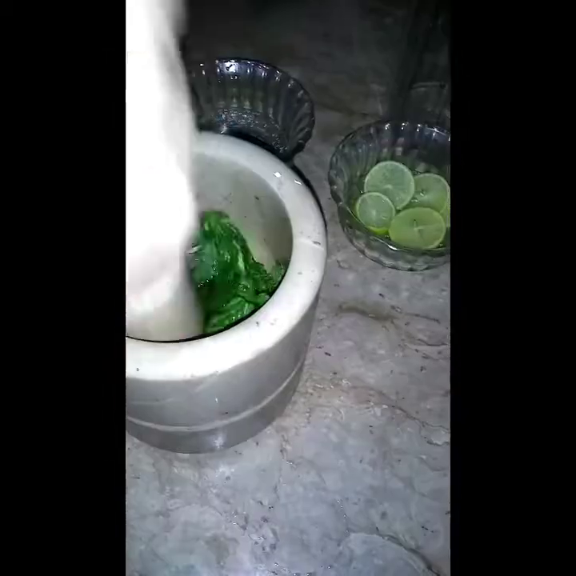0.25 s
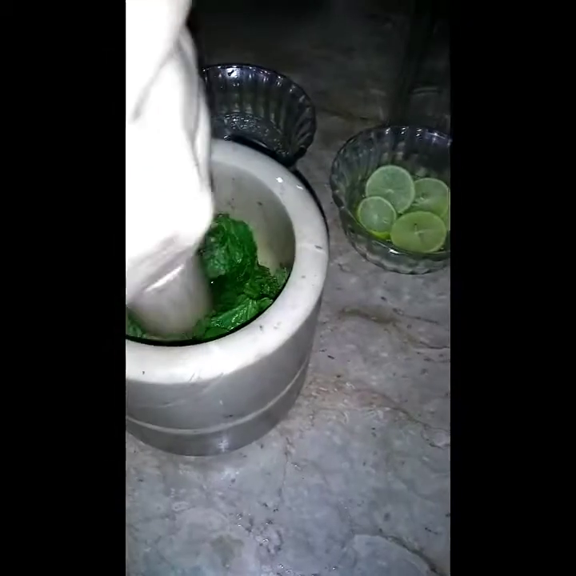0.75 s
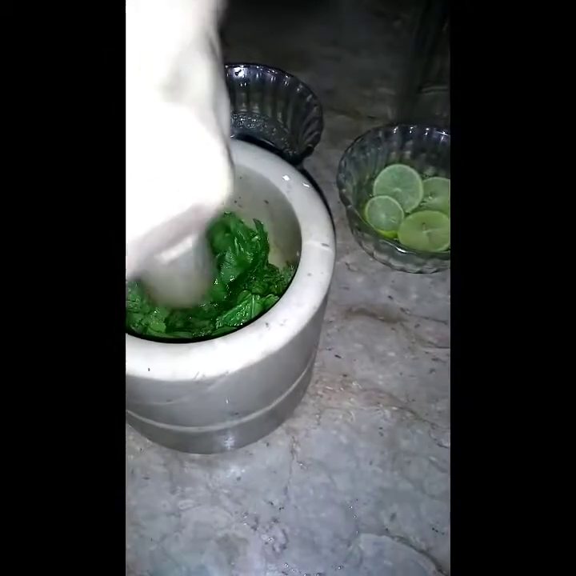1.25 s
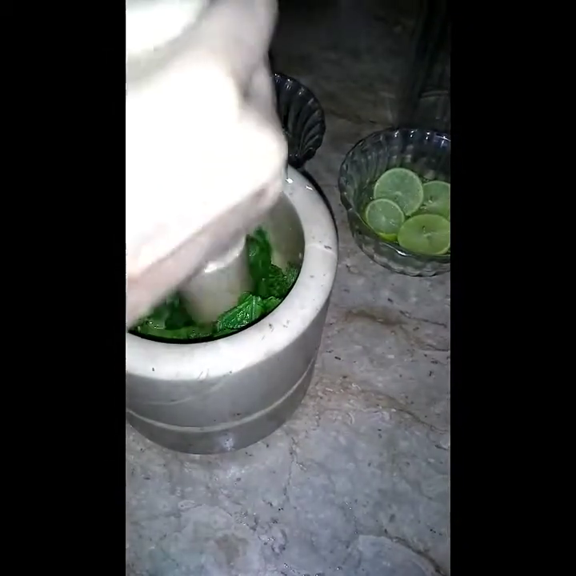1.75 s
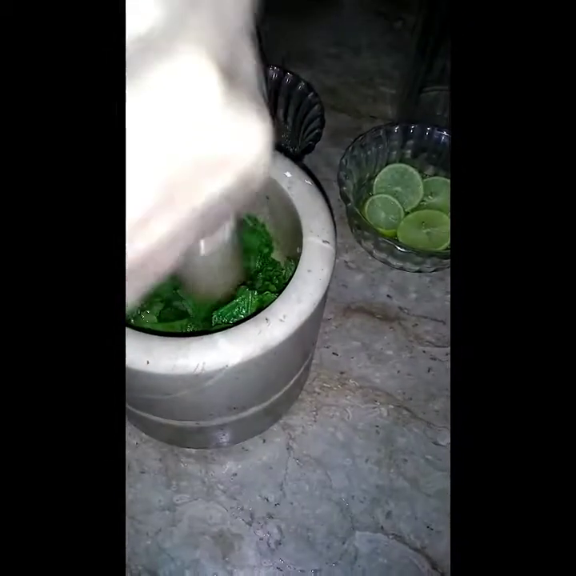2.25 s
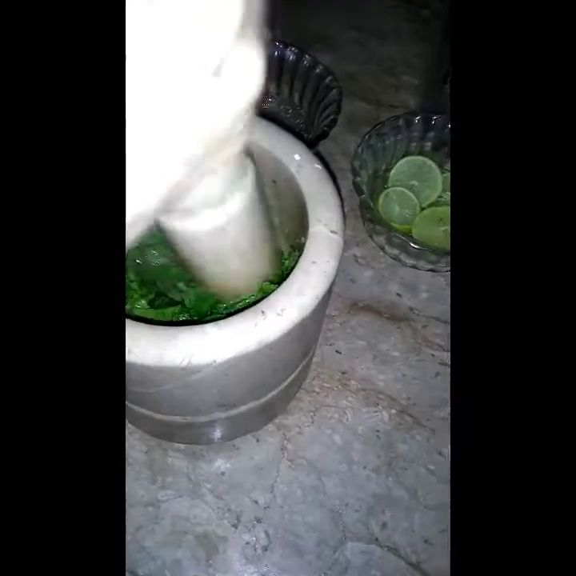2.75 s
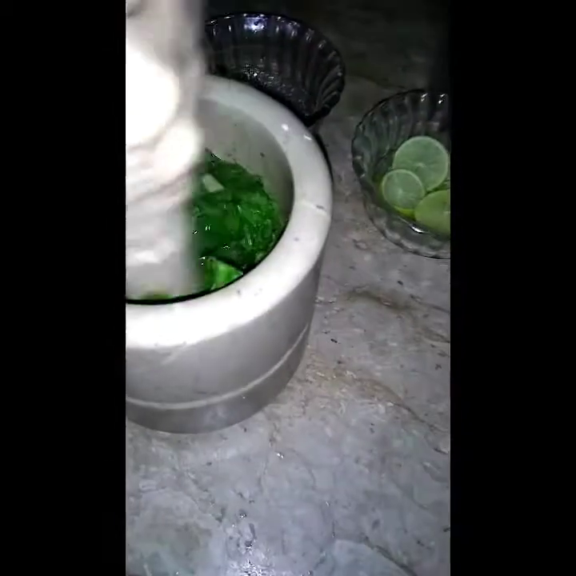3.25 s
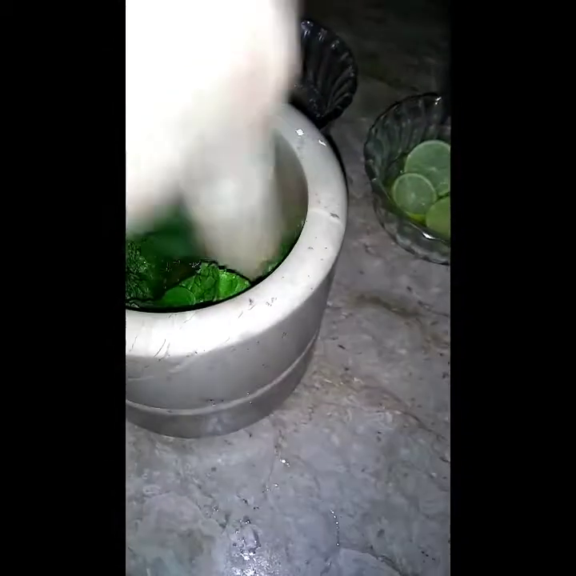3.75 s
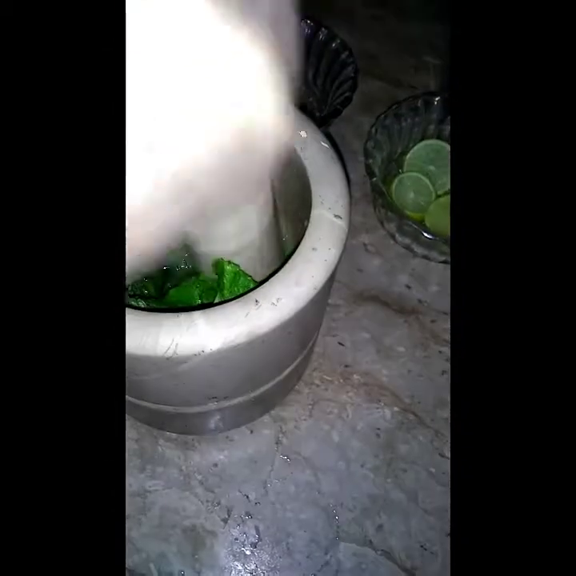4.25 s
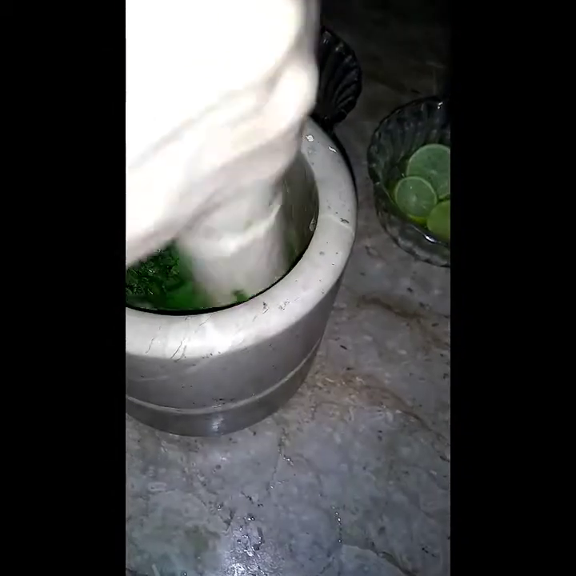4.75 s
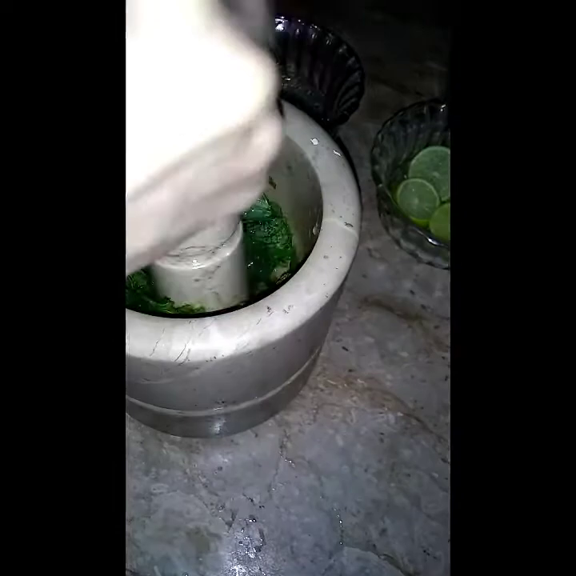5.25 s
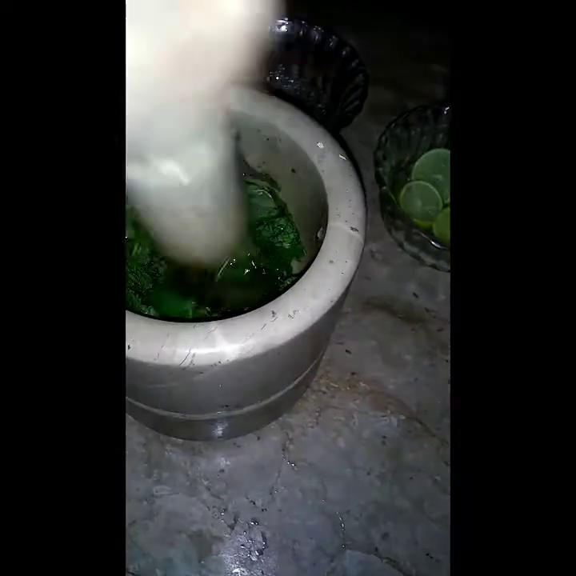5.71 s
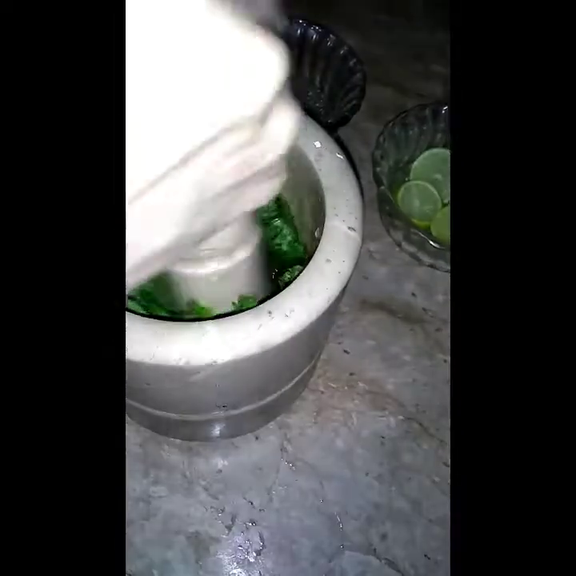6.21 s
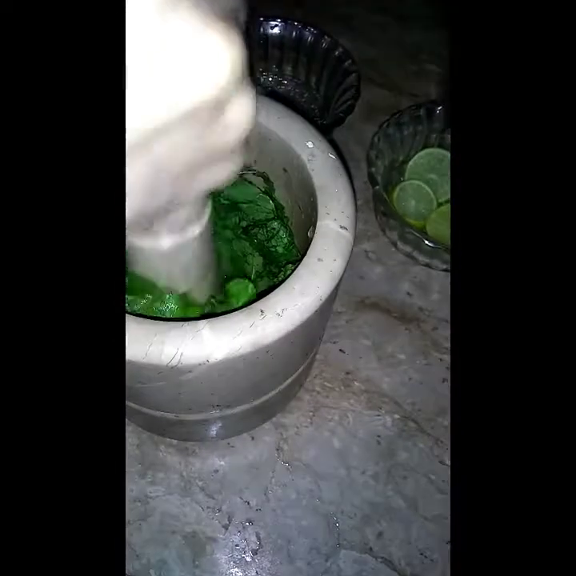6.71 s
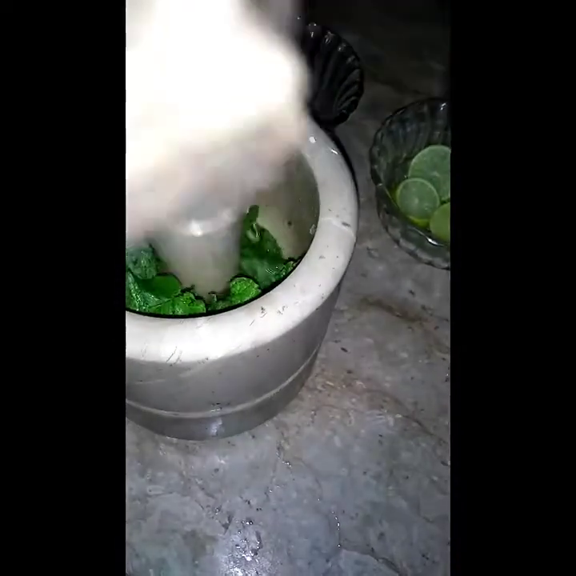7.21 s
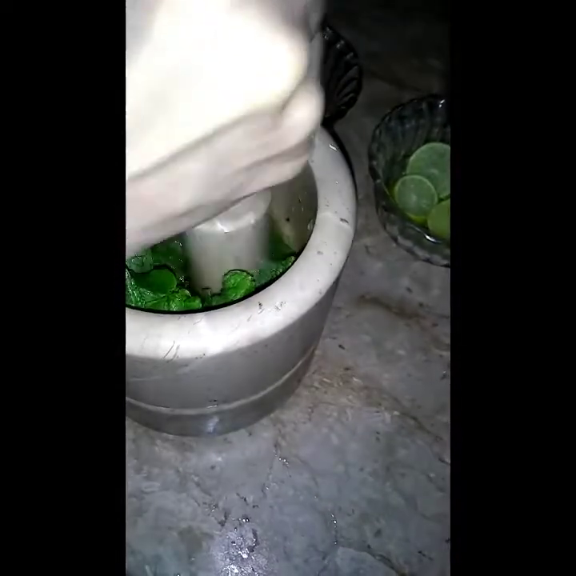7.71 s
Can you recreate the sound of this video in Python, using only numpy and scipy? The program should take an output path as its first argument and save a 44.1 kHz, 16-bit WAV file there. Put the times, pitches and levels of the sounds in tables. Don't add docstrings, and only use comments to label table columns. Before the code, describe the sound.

A stone pestle crunches and grinds leaves in a stone mortar, with irregular knocks and clacks, over a steady low fan hum.

```python
import sys
import numpy as np
from scipy import signal
from scipy.fft import rfft, irfft, next_fast_len
from scipy.io import wavfile
from scipy.ndimage import uniform_filter1d, minimum_filter1d, map_coordinates

SR = 44100
rng = np.random.default_rng(int(sys.argv[2]) if len(sys.argv) > 2 else 0)


def gain_from_db(level_db):
    decades = np.asarray(level_db, float) / 20
    return 10 ** decades


def waveform_to_disk(signal):
    frames = np.transpose(np.atleast_2d(signal))
    scaled = np.clip(frames, -1, 1) * 32767
    samples = np.round(scaled).astype(np.int16)
    wavfile.write(sys.argv[1], SR, samples)


N = 351477

# f/Hz, likeness [0..1]
PORT_LIKENESS = [(50, 0.71), (100, 0.85), (210, 0.98), (400, 0.6), (800, 0.38), (1500, 0.007),
                 (5000, 0.017)]


def unit(x):
    return x / np.sqrt(np.mean(x ** 2) + 1e-20)


def along(points, hz):
    f, v = np.transpose(points)
    return np.interp(np.log(hz + 1), np.log(f + 1), v)


def curve(rows):
    return np.interp(np.arange(N) / SR, *np.transpose(rows))


def filtered(x, response):
    m = next_fast_len(N + SR // 2)
    return irfft(rfft(x, m) * response(np.fft.rfftfreq(m, 1 / SR)), m)[..., :N]


def coloured(x, tone):
    def response(hz):
        gain = gain_from_db(along(tone, hz))
        return gain / np.sqrt(np.mean(gain ** 2))
    return filtered(x, response)


def wobble(rate):
    knots = rng.standard_normal(int(N * rate / SR) + 4)
    return map_coordinates(knots, [np.arange(N) * rate / SR])


def gritty(spread_db, rate):
    return unit(rng.standard_normal((2, N)) * gain_from_db(spread_db * wobble(rate)))


def patchy(x, depth_db, size):
    z = signal.stft(x, nperseg=size)[2]
    field = uniform_filter1d(rng.standard_normal(z.shape[1:]), size=5, axis=0)
    field = uniform_filter1d(field, size=6, axis=1)
    return unit(signal.istft(z * gain_from_db(depth_db * unit(field)), nperseg=size)[1][:, :N])


def add(out, s, sound):
    part = out[:, round(s * SR):][:, :sound.shape[-1]]
    part += sound[..., :part.shape[-1]]


def ring(modes, scatter_db, attack, skew, rough_db=0, lag=0):
    block = 150
    t = np.arange(SR // 4 // block * block) / SR
    hz, db, t60 = np.transpose(modes)[:, :, None]
    flutter = np.repeat(rng.standard_normal((2, len(hz), len(t) // block)), block, axis=2)
    level_db = db + scatter_db * rng.standard_normal(hz.shape) - 60 * t / t60
    size = gain_from_db(level_db + rough_db * uniform_filter1d(flutter, size=block))
    phase = skew * np.minimum(hz / 600, 1) * rng.standard_normal((2,) + hz.shape)
    late = np.reshape([lag, 0], (2, 1, 1))
    partials = size * np.sin(2 * np.pi * hz * (t - late) + phase)
    return np.sum(partials, axis=1) * (1 - np.exp(-t / attack))


# f/Hz, level/dB
LEAF_COLOUR = [(600, -39), (1300, -14.5), (2000, -6), (3500, 1.5), (5000, -4), (8000, -8), (11000, -12.5),
               (14500, -21)]


def crushed_leaves():
    # t/s, peak level/dB, bowl level/dB, sheen level/dB, pace/s
    pounding = [(0.1205, -33.5, -18, -25, 0.0068), (0.285, -29.5, -12, -38, 0.0071),
                (0.5453, -22.5, -10.5, -23, 0.0086), (0.816, -20, -10, -25, 0.0076),
                (1.119, -27, -1.5, -9, 0.0082), (1.3847, -20, -10.5, -38, 0.0075),
                (1.702, -25, -5, -14, 0.0073), (1.7494, -45, -14, -21, 0.0062),
                (1.97, -25, -1.5, -9, 0.0067), (2.0158, -34.5, -26, -34, 0.015),
                (2.228, -20, -9, -15, 0.0063), (2.4854, -18.5, -11, -23, .0057),
                (2.83, -29, -4.5, -15, .009), (3.734, -21, -7.5, -16, 0.0056),
                (3.9994, -20.5, -12.5, -61, 0.0079), (4.037, -26.5, -68, -27, 0.00084),
                (4.229, -15.5, -25, -15.5, 0.005), (4.495, -22, -34, -12, 0.0026),
                (4.508, -24, -17, -15.5, .005), (4.792, -32.5, -6, -32, .009),
                (6.738, -36, -8, -12, 0.0049), (7.001, -20.5, -8.5, -24, 0.0062)]
    # f/Hz, level/dB
    sheen_colour = [(5000, -36), (8000, 9.5), (11000, 5), (14500, -0.5)]
    # f/Hz, width/Hz, level/dB
    bowl_air = [(945, 78, 8), (1950, 230, -2), (3460, 660, -4)]
    press_s, decay_paces = 0.0085, 8.1
    t = np.arange(N) / SR
    burst, boom, sheen = np.zeros((3, N))
    for s, db, bowl_db, sheen_db, pace in pounding:
        since = t - s - .0012
        fall = -np.log(1000) * (since - press_s).clip(0) / (decay_paces * pace)
        shape = np.exp(np.minimum(since / pace, fall))
        burst += gain_from_db(db - 7.5) * shape
        sheen += gain_from_db(db + sheen_db + 0.5) * shape
        boom += gain_from_db(db + bowl_db + 15) * shape ** 1.52

    def cavity(hz):
        total = 0
        for k, (centre, width, db) in enumerate(bowl_air):
            band = 1j * hz * width
            total = total + (-1) ** k * gain_from_db(db) * band / (centre ** 2 - hz ** 2 + band)
        return total

    grit = coloured(burst * patchy(gritty(3.3, rate=500), 4.54, size=128), LEAF_COLOUR)
    grit += coloured(sheen * gritty(2.6, rate=500), sheen_colour)
    return grit + filtered(boom * gritty(1.66, rate=300), cavity)


def dragged_leaves():
    # t/s, level/dB
    pressure = [(0.0, -53.5), (0.15, -61), (1.3, -56.5), (1.46, -93), (1.69, -47.5), (1.9, -62),
                (2.48, -70), (2.9, -50), (3.25, -53.5), (3.66, -65), (3.84, -53.5), (4.35, -62),
                (4.86, -55), (5.3, -61), (6.2, -59), (7.1, -59.5), (7.66, -56.5), (7.97, -66)]
    # t/s of the height, level/dB, width/s
    scrapes = [(.1, -55, 0.011), (1.089, -45.5, 0.022), (1.43, -57, 0.078), (2.79, -53, 0.035),
               (2.928, -60, 0.023), (3.085, -51.5, 0.012), (3.22, -62, 0.016), (3.72, -44, 0.032),
               (3.98, -60, .015), (4.3, -70, 0.038), (4.748, -49, 0.042), (4.93, -57.5, 0.027),
               (5.9, -46, 0.024), (6.07, -49.5, 0.028), (6.108, -49, 0.009), (6.35, -60, .02),
               (6.76, -57, 0.0091), (6.95, -52.5, 0.04), (7.86, -60.5, 0.036)]
    t = np.arange(N) / SR
    scrape = sum(gain_from_db(db) * np.exp(-((t - s) / width) ** 2) for s, db, width in scrapes)
    drag = gain_from_db(curve(pressure) + 3.0) + gain_from_db(6.5) * scrape
    drag = drag * gain_from_db(1.8 * wobble(25))
    return coloured(drag * gritty(1.8, rate=570), LEAF_COLOUR)


def snapped_stems():
    # t/s, peak level/dB, f/Hz
    snaps = [(3.1404, -36, 3170), (3.192, -47, 3400), (3.765, -42, 3400), (5.6106, -61, 2900),
             (6.1679, -41, 3370), (6.313, -49, 3360), (6.4862, -42.5, 3300), (7.2744, -57, 3470),
             (7.397, -51, 3430), (7.6854, -48, 3500)]
    out = np.zeros((2, N))
    for s, db, hz in snaps:
        modes = [(hz, db + 14.0, .012), (1.1 * hz, db + 16, .008)]
        add(out, s, ring(modes, 0.5, .0003, 0.99))
    return out


def counter_blows():
    # t/s, peak level/dB, deep modes/dB, upper modes/dB, decay factor
    thuds = [(2.24, -32, -5, 6, 0.54), (2.505, -19.5, -5, -14, 0.6), (4.237, -10, -24.5, -17, 1.2),
             (4.513, -16.5, -7, -20, 1.2), (6.113, -9, -28, -20, 0.62), (6.481, -23.5, -18, -22, 1.7)]
    # t/s, peak level/dB, middle modes/dB, upper modes/dB, decay factor
    knocks = [(3.085, -14.5, -0.5, -20, 0.72), (3.144, -14, -1.5, 3, 0.91), (3.313, -18.5, 0.5, -16, 1.06),
              (3.329, -13, 2.5, 10, 1.1), (3.684, -21.5, 5.5, 16, 1.01), (5.322, -14.5, -9.5, -22, 0.63),
              (5.4, -26, -13, -7, .91), (5.832, -26.5, 5, 4, 3.5), (5.866, -30.5, 9.5, 13, 2.1),
              (5.885, -23.5, 0, 13, 2.2), (6.413, -30, -1, -16, 1.1), (6.42, -10.5, -15, -19, 0.72),
              (6.449, -23.5, -4.5, -12, 1.3), (6.57, -39, 8, -18, 2.2), (6.594, -33.5, 4.5, -19, 1.4),
              (6.61, -26, 1.5, -15, 0.91), (6.627, -23.5, 0, 7, 0.74), (7.909, -14.5, -2, 2.5, 0.94),
              (7.954, -18.5, -1.5, -14, 0.7), (7.962, -14.5, -3, -9, 1)]
    # f/Hz, level/dB, t60/s
    counter_modes = [(89, 11, 0.28), (123, 4, 0.3), (192, -18, 0.13), (263.4, 0.5, 0.12),
                     (347.4, -4.5, 0.18), (483, -21, 0.4), (561.4, 7, 0.056), (650, -13, 0.041),
                     (864, -6, 0.096), (1073, -8.5, 0.037), (1293, -13, 0.065), (1460, 0, 0.011),
                     (1597, -22.5, 0.21), (1820, -6.5, 0.011), (2100, -12.5, 0.059), (2500, -43, 0.19)]
    group_edges = [150, 450, 1000, 3000]
    thud_middle_db, knock_deep_db = -17.5, -27
    hits = [(s, db, deep_db, thud_middle_db, *rest) for s, db, deep_db, *rest in thuds]
    hits += [(s, db, knock_deep_db, *rest) for s, db, *rest in knocks]
    out, rattle = np.zeros((2, 2, N))
    hz, level_db, t60 = np.transpose(counter_modes)
    t = np.arange(SR // 4) / SR
    for s, db, deep_db, middle_db, upper_db, lasting in sorted(hits):
        contact_s = 0.00064 * gain_from_db(-.6 * upper_db)
        group_db = np.array([deep_db, 0, middle_db, upper_db, 0])[np.digitize(hz, group_edges)]
        modes = np.transpose([hz, db - 7.0 + level_db + group_db, t60 * lasting])
        add(out, s, ring(modes, 2.13, contact_s, 1.0, rough_db=7.0))
        rattle_size = gain_from_db(db + middle_db - 1.5 - 60 * t / (0.11 * lasting))
        add(rattle, s, rattle_size * rng.standard_normal((2, len(t))))
    out = filtered(out, lambda f: f ** 3 / (f ** 3 + 106.0 ** 3))
    dull = [(100, -32.5), (250, 4.5), (900, 6.5), (1800, -22), (3000, -26.5), (8000, -46)]
    return out + coloured(rattle, dull)


def stone_clacks():
    # t/s, crack level/dB, pestle level/dB, dishes level/dB
    clacks = [
        (1.971, -24.5, -60, -80),
        (3.329, -18, -49, -34.5),
        (3.685, -27, -37, -104),
        (5.832, -6.5, -14.5, -80),
        (5.869, -10.5, -80, -80),
    ]
    # f/Hz, level/dB, t60/s
    pestle_modes = [(3200, 10, 0.009), (4800, 9, 0.074), (4800, -13, 0.53), (5400, -15, 0.25),
                    (10000, -23.5, 0.45), (11600, -25, 0.086), (12510, -31, .1)]
    # f/Hz, level/dB, t60/s
    dish_modes = [(8200, -2, 0.15), (8350, -12, .08), (9300, -2.5, .13), (9700, -16, .06),
                  (10400, -16, .06), (11120, -16, 0.13), (11800, -14, .07), (12200, -5, 0.11),
                  (12600, -4, 0.13)]
    # f/Hz, level/dB
    crack_colour = [(300, -6), (1000, -3), (2500, 5), (4500, -11), (6000, -24.5), (14000, -40)]
    rim_lag = .00028
    out, crack = np.zeros((2, 2, N))
    t = np.arange(SR // 4) / SR
    for s, crack_db, pestle_db, dishes_db in clacks:
        shared, own = rng.standard_normal(len(t)), rng.standard_normal((2, len(t)))
        split = np.array([np.roll(shared, round(rim_lag * SR)), shared]) + 2.2 * own
        fade = gain_from_db(crack_db - 60 * t / 0.0076) + gain_from_db(crack_db - 20.5 - 60 * t / 0.22)
        add(crack, s, fade * split)
        add(out, s, gain_from_db(pestle_db) * ring(pestle_modes, 0.6, 0.0006, 0.18, rough_db=3.0, lag=rim_lag))
        add(out, s, gain_from_db(dishes_db) * ring(dish_modes, 1.5, 0.0051, 0.73, rough_db=7.5))
    return out + coloured(crack, crack_colour)


def glass_tinkles():
    # t/s, level/dB
    tinkles = [(3.085, -60), (3.19, -60), (5.33, -65)]
    # f/Hz, level/dB, t60/s
    glass_modes = [(5070, 0, 0.18)]
    out = np.zeros((2, N))
    for s, db in tinkles:
        add(out, s, gain_from_db(db) * ring(glass_modes, 1, .01, 1.5, rough_db=14))
    return out


def kitchen(x):
    # f/Hz, t60/s
    room_decay = [(200, 0.83), (1000, 0.51), (4000, 0.2), (12000, 0.33)]
    hz, t, z = signal.stft(rng.standard_normal((2, SR // 2)), SR, nperseg=256)
    decay = gain_from_db(-60 * t / along(room_decay, hz)[:, None])
    tail = signal.istft(z * decay, SR, nperseg=256)[1]
    delayed = np.pad(x, ((0, 0), (200, 0)))
    return signal.fftconvolve(delayed, tail / np.linalg.norm(tail[0]), axes=1)[:, :N]


def fan():
    # f/Hz, level/dB
    air_colour = [(40, -8), (90, -4.5), (130, -9.5), (185, -1.5), (250, 3), (310, -9.5), (360, -2),
                  (450, -8), (900, -8), (1250, -16.5), (2000, -22), (3400, -28.5), (5000, -38.5),
                  (14000, -43)]
    # f/Hz, level under the air noise/dB
    blade = (94, -14.5)
    air = coloured(patchy(rng.standard_normal((2, N)), 2.15, size=1024), air_colour)
    phase = 2 * np.pi * blade[0] * np.arange(N) / SR + 1.7 * wobble(10)
    hum = gain_from_db(blade[1] + 3.1 * wobble(5.5)) * np.sin(phase + [[0], [.25]])
    return gain_from_db(-36.5 + 0.8 * wobble(17)) * (air + hum)


def scene():
    near = crushed_leaves() + dragged_leaves() + snapped_stems()
    near += counter_blows() + stone_clacks() + glass_tinkles()
    paths = near + gain_from_db(-12.0) * kitchen(near) + fan()
    mix_angle = lambda hz: np.arcsin(np.clip(along(PORT_LIKENESS, hz), 0, .999)) / 2
    own = filtered(paths, lambda hz: np.cos(mix_angle(hz)))
    return own + filtered(paths[::-1], lambda hz: np.sin(mix_angle(hz)))


def cross_feed(ports):
    # f/Hz, share [0..1]
    cross_share = [(100, 0.96), (1500, 0.48), (2400, 0.68), (3500, 0.52), (4700, 0.32), (6000, 0.12),
                   (8000, 0.036), (14000, 0.027)]
    # f/Hz, level/dB
    side_tilt = [(100, 0.5), (330, 1.5), (800, 1), (3000, 0), (5000, -3.5), (14000, -3.5)]
    # f/Hz, level/dB
    top_end = [(14200, -1.5), (14500, -14), (15000, -28), (15600, -50)]
    lag = 0.0004434
    share = lambda hz: np.clip(along(cross_share, hz), 0, .999)

    def even(hz):
        likeness = np.clip(along(PORT_LIKENESS, hz), 0, .999)
        overlap = 2 * share(hz) * likeness * np.cos(2 * np.pi * hz * lag)
        return 1 / np.sqrt(1 + share(hz) ** 2 - overlap)

    def tone(hz):
        return even(hz) * gain_from_db(along(side_tilt, hz) * [[.5], [-.5]] + along(top_end, hz))

    sides = ports - filtered(ports[::-1], lambda hz: share(hz) * np.exp(-2j * np.pi * hz * lag))
    return filtered(sides, tone)


def gain_control(x):
    heed_db = -9.5
    knee_db, squeeze, makeup_db = -34.5, 0.59, 3
    grab_s, let_go_s = 0.087, 0.18
    power = np.mean(filtered(x, lambda hz: 1 + gain_from_db(heed_db) * hz / 1000) ** 2, axis=0)
    for lag_s in (grab_s, let_go_s):
        keep = np.exp(-1 / (SR * lag_s))
        start = [power[:SR // 10].mean()]
        power = signal.lfilter([1 - keep], [1, -keep], power, zi=start)[0]
    return x * gain_from_db(makeup_db) * (1 + power / gain_from_db(2 * knee_db)) ** (-squeeze / 2)


def soft_limit(x):
    return x / (1 + abs(x / .97) ** 4) ** (1 / 4)


def thin_sum_and_difference(sides, under_db, masked_db):
    hz, _, z = signal.stft([sides[0] + sides[1], sides[0] - sides[1]], SR, nperseg=1024)
    power = uniform_filter1d(uniform_filter1d(abs(z) ** 2, size=9, axis=1), size=3, axis=2)
    strongest = -minimum_filter1d(-power.max(axis=0), size=61, axis=0)
    nearby = strongest * (hz > 6200)[:, None]
    kept = (power > gain_from_db(2 * under_db) * power[::-1]) & (power > gain_from_db(2 * masked_db) * nearby)
    mid, side = signal.istft(z * kept, nperseg=1024)[1][:, :N]
    return np.array([mid + side, mid - side]) / 2


def drop_out(sides):
    # start t/s, end t/s
    gap = (0.2176, .286)
    t = np.arange(N) / SR
    fading = gain_from_db(-15 - 1600 * (t - gap[0]).clip(0)) * (t < gap[0] + .032)
    return sides * np.where((t > gap[0]) & (t < gap[1]), fading, 1)


def top_cut(x):
    return signal.sosfilt(signal.butter(12, 15650, fs=SR, output="sos"), x)


def record(dry):
    sides = soft_limit(gain_control(cross_feed(dry)))
    sides = thin_sum_and_difference(sides, under_db=-9, masked_db=-16)
    return top_cut(drop_out(sides))


dry = scene()
out = record(dry)
waveform_to_disk(out)
```